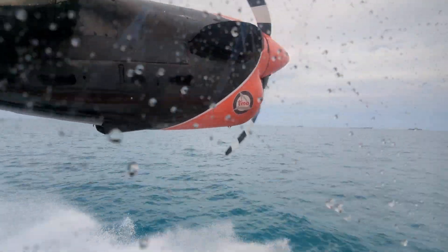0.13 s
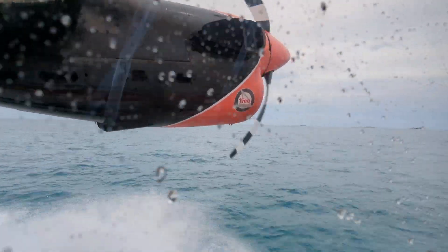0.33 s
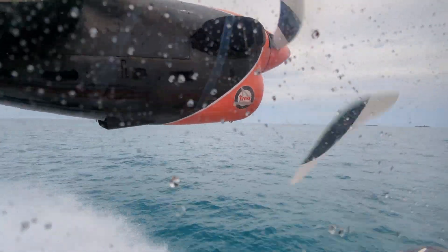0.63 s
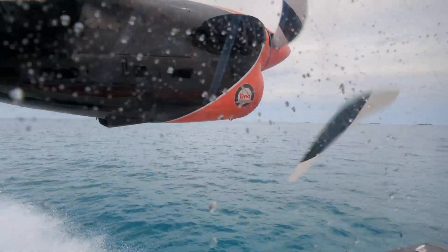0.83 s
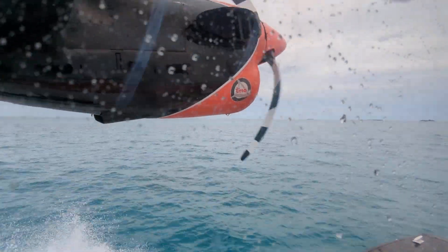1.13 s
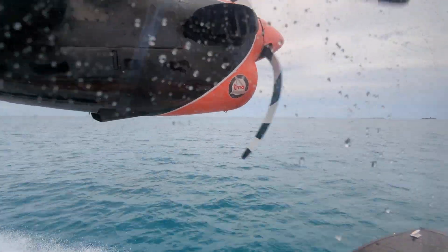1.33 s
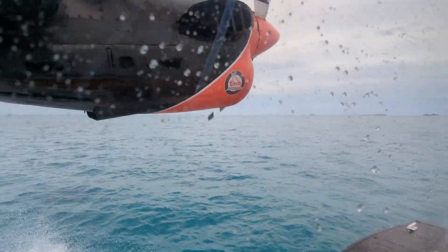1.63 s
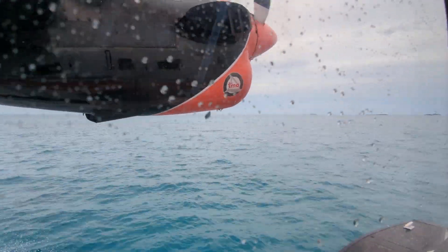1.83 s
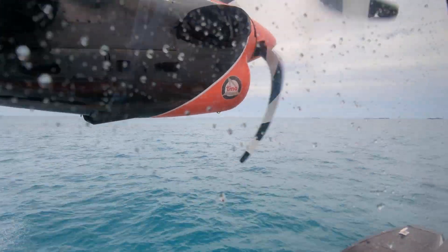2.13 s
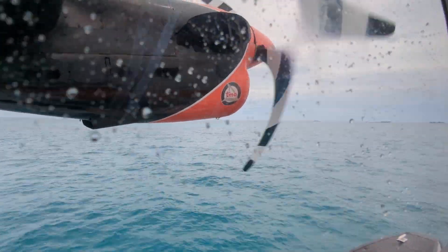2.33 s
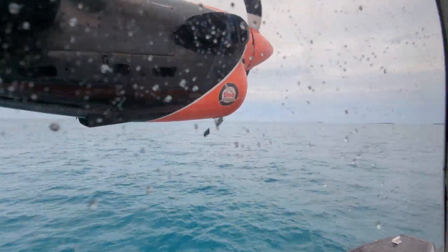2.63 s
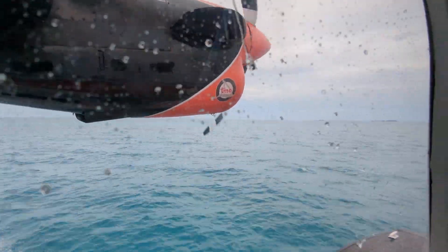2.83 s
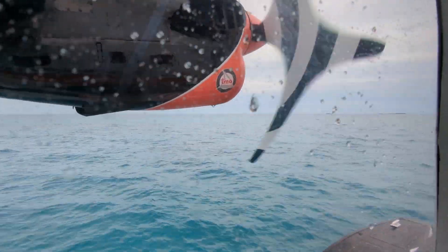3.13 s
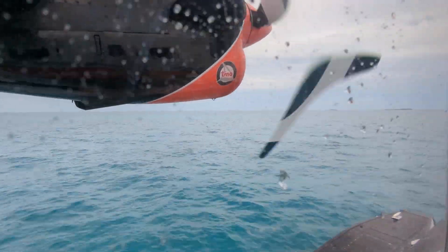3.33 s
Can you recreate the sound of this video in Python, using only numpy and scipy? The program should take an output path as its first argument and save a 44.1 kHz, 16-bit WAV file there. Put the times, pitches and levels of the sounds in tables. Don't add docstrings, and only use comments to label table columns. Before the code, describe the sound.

A loud turboprop propeller drone runs unbroken for about 3.5 seconds inside a small seaplane cabin: a deep hum near 105 hertz with strong overtones, two propellers beating slowly and shifting between sides. Beneath lie hull rumble, air roar and faint turbine hiss and whine, easing near 2.9 and returning by 3.4. Soft low float knocks, mostly buried, fall near 0.1, 0.9, 1.1, 2.2 and 3.0.

```python
import sys
import numpy as np
from scipy import signal
from scipy.io import wavfile

SR = 44100
rng = np.random.default_rng(int(sys.argv[2]) if len(sys.argv) > 2 else 0)


def level_to_linear(level):
    exponent = np.asarray(level, float) / 20
    return 10 ** exponent


def log_audio(samples):
    frames = np.atleast_2d(samples).T
    limited = np.clip(frames, -1, 1)
    pcm = np.round(limited * 32767).astype(np.int16)
    wavfile.write(sys.argv[1], SR, pcm)


N = 153468

BLADE_HZ = 104.65


def in_time(rows):
    s, *columns = np.transpose(rows)
    return [np.interp(np.arange(N) / SR, s, c) for c in columns]


def at_hz(points, hz):
    table_hz, values = np.transpose(points)
    return np.interp(np.log(hz), np.log(table_hz), values)


def rms_one(x):
    return x / np.sqrt(np.mean(x ** 2) + 1e-20)


def drift(rate_hz):
    r = np.exp(-40 * 2 * np.pi * rate_hz / SR)
    settle = 2000
    slow = signal.lfilter([1], [1, -2 * r, r * r], rng.standard_normal(N // 40 + settle + 2))[settle:]
    return np.interp(np.arange(N) / 40, np.arange(len(slow)), rms_one(slow))


# (time [s], near slip [Hz], far slip [Hz], blade level [dB], place [-1 to 1])
GOVERNORS = [(0, .023, -.309, -1.8, -.57), (.25, .096, -.339, .7, -1), (.5, .141, -.237, -2, -.43),
             (.75, .148, -.634, -2.1, .11), (.99, .188, -.079, 2.9, -.26), (1.24, .246, -.405, .2, .12),
             (1.49, .333, -.165, -.3, .04), (1.74, .266, -.312, -1.8, .13), (1.99, .164, -.144, .1, .17),
             (2.24, .106, -.263, .3, -.02), (2.49, .148, -.019, -2.3, .14), (2.73, .245, -.15, -2.2, .13),
             (2.98, .364, .059, -2.2, .14), (3.23, .333, -.103, .2, .11), (3.48, .188, .2, .8, -.05)]


def governors():
    near_slip, far_slip, blade_db, place = in_time(GOVERNORS)
    start_cycles = 0.282
    near = start_cycles + np.cumsum(BLADE_HZ + near_slip) / SR
    far = start_cycles + np.cumsum(BLADE_HZ + far_slip) / SR
    return near, far, blade_db, place


def shaken(order):
    height = 0.015 * drift(3) + 0.04 * drift(7)
    timing = 0.015 * drift(3) + 0.04 * drift(7)
    return np.exp(order ** 0.7 * (height + 1j * timing))


# (near left [dB], near right [dB], far left [dB], far right [dB], far blade ahead [cycles])
BLADE_ORDERS = [(-22.5, -18.3, -15, -15.5, .93), (-14, -16.1, -10.9, -13, .23),
                (-20.3, -22.5, -16.7, -18.6, .11), (-17.9, -21.6, -28.6, -33.8, .84),
                (-23.6, -29.5, -30.5, -39, .17), (-36.5, -47, -33, -44, .61), (-34.5, -44.5, -47, -47, .66),
                (-38, -50, -46, -57, .85), (-43, -51, -53, -53, .9), (-45, -48.5, -53, -56, .7),
                (-55, -55, -58, -58, .3), (-57, -60, -61, -61, .7), (-60, -56, -62, -60, .2),
                (-55, -61, -60, -63, .6)]
# (frequency [Hz], lag [cycles])
RIGHT_LAG = [(100, 0.06), (200, -0.031), (420, 0.0036), (525, 0.13), (630, 0.19), (1000, 0.51)]
# (frequency [Hz], near [dB per unit of place], far [dB per unit of place])
CABIN_WAVES = [(105.0, -2.9, 0.8), (209.0, 26.0, -0.6), (314.0, 0.1, -5.4), (419.0, -4.1, -7.6),
               (523.0, 2.9, 2.0), (628.0, -0.3, -5.1), (733.0, -6.6, -4.5), (900, -2, 2)]
# (shaft multiple, level [dB])
UNEQUAL_BLADES = [(2, -62), (4, -39), (5, -44.5), (7, -45), (8, -71), (14, -57)]


def propellers(near, far, place):
    out = 0
    waves = np.array(CABIN_WAVES)
    for order, (near_l, near_r, far_l, far_r, ahead) in enumerate(BLADE_ORDERS, 1):
        hz = order * BLADE_HZ
        near_wave = level_to_linear(place * at_hz(waves[:, [0, 1]], hz))
        far_wave = level_to_linear(place * at_hz(waves[:, [0, 2]], hz))
        near_turn = np.exp(2j * np.pi * order * near)
        far_turn = np.exp(2j * np.pi * (order * far + ahead))
        lag = np.array([[0], [at_hz(RIGHT_LAG, hz)]])
        near_sides = level_to_linear([[near_l], [near_r]]) * np.exp(-2j * np.pi * lag)
        far_sides = level_to_linear([[far_l], [far_r]])
        near_tone = shaken(order) * near_wave * near_turn * near_sides
        far_tone = shaken(order) * far_wave * far_turn * far_sides
        out = out - np.imag(near_tone + far_tone)
    for multiple, db in UNEQUAL_BLADES:
        phase = 2 * np.pi * multiple * near / 3
        out = out + level_to_linear(db + 3.0 * drift(4.0)) * np.sin(phase + 0.8 * drift(3.0))
    return out


# (time [s], level [dB])
AIR_VIGOUR = [
    (0.0, -43),
    (0.03, -41.5),
    (0.6, -45),
    (0.9, -41.5),
    (1.71, -44.5),
    (1.95, -42.5),
    (2.46, -44),
    (2.86, -47.5),
    (3.47, -42),
    (3.48, -43),
]


def vigour():
    return in_time(AIR_VIGOUR)[0]


# (frequency [Hz], left minus right [dB])
BALANCE = [(60, -12.5), (200, 6.5), (650, 7), (1100, 4.5), (2000, -7.5), (3300, -4), (5200, -11),
           (6200, -11.5)]
BALANCE_HIGH = [(6300, -6), (7200, 7.5), (8000, 2.5), (9000, 4), (12000, 1), (13500, 1)]


def sides(hz):
    left_right_db = at_hz(BALANCE + BALANCE_HIGH[1:], hz)
    return level_to_linear(left_right_db / 2 * np.array([[1], [-1]]))


# (frequency [Hz], correlation [-1 to 1])
ALIKE = [(60, 0.99), (130, 0.61), (400, .9), (700, 0.55), (1300, 0.26), (2500, .25), (5000, 0.033),
         (15000, .05)]


def banded(spectrum, patchy_db, count):
    edges = np.geomspace(spectrum[0][0], min(spectrum[-1][0], 0.45 * SR), count + 1)
    white = rng.standard_normal((2, 2, N))
    together = drift(2.7)
    out = 0
    for k, (low, high) in enumerate(zip(edges, edges[1:])):
        band = signal.butter(2, [low, high], "band", fs=SR, output="sos")
        mid, side = signal.sosfilt(band, white[k % 2])
        hz = np.sqrt(low * high)
        alike = np.clip(at_hz(ALIKE, hz), -1, 1)
        gain = level_to_linear(at_hz(spectrum, hz) + patchy_db * (0.27 * together + drift(18.0)))
        stereo = np.sqrt(1 + alike) * mid + np.sqrt(1 - alike) * side * [[1], [-1]]
        left, right = gain * sides(hz) * stereo
        if hz > 800:
            right = np.roll(right, int(0.00037 * SR))
        out = out + np.array([left, right])
    return out / np.sqrt(np.mean(out.mean(axis=0) ** 2))


# (frequency [Hz], density [dB per Hz])
RUMBLE_SPECTRUM = [(25, -8), (45, -30.5), (70, 0), (100, 0.5), (260, 3), (470, -7.5), (800, -11.5),
                   (1200, -9.5)]


def hull_rumble(flow_db):
    level_db = -29 + 0.78 * (flow_db - flow_db.mean())
    return level_to_linear(level_db) * banded(RUMBLE_SPECTRUM, patchy_db=1.5, count=12)


# (frequency [Hz], density [dB per Hz])
ROAR_SPECTRUM = [(1200, -6), (1400, -3.5), (2100, -6), (2900, -10.5), (3300, -13.5), (6200, -19),
                 (7000, -15.5), (8000, -30.5)]
# (frequency [Hz], density [dB per Hz])
HISS_SPECTRUM = [(8000, -12.5), (8700, 1.5), (9400, 1), (11000, 1.5), (12100, 2), (12900, -8), (15000, -7),
                 (17000, -7)]


def airflow(flow, near):
    roar = level_to_linear(0.94) * banded(ROAR_SPECTRUM, patchy_db=0.65, count=14)
    hiss = level_to_linear(-9.5) * banded(HISS_SPECTRUM, patchy_db=0.6, count=10)
    chop = 1 + 0.03 * np.cos(2 * np.pi * near)
    return flow * (roar + hiss) * chop


# (frequency [Hz], left [dB], right [dB])
GEAR_TONES = [(1987, -68, -60), (2971, -65, -78), (3078, -66, -78), (3180, -70, -78), (9968, -67, -73)]
# (frequency [Hz], width [Hz], level against the flow [dB])
INLET_WHISTLE = [(9975, 200, -15), (10080, 600, -13.5)]


def turbine(flow):
    out, t = 0, np.arange(N) / SR
    for hz, left_db, right_db in GEAR_TONES:
        level = level_to_linear(np.array([[left_db], [right_db]]) + 4.8 * drift(2.4))
        out = out + level * np.sin(2 * np.pi * hz * t + 1.1 * drift(4.5))
    for hz, width, db in INLET_WHISTLE:
        r = np.exp(-np.pi * width / SR)
        resonance = [1, -2 * r * np.cos(2 * np.pi * hz / SR), r * r]
        air = signal.lfilter([1, 0, -1], resonance, rng.standard_normal((2, N)))
        band = signal.butter(2, [hz - 420, hz + 700], "band", fs=SR, output="sos")
        air = rms_one(signal.sosfilt(band, air))
        level = flow * level_to_linear(db + 3.0 + 2.0 * drift(8.3))
        out = out + level * level_to_linear([[3.0], [-3.0]]) * air
    return out


# (time [s], peak [dB])
FLOAT_SLAPS = [
    (.07, -36),
    (.91, -33),
    (1.08, -36),
    (2.23, -27),
    (2.97, -33),
]


def floats():
    slaps = np.zeros(N)
    for s, db in FLOAT_SLAPS:
        slaps[int(s * SR)] = level_to_linear(db)
    hull_hz, t60_s = 77.5, 0.11
    r, w = level_to_linear(-60 / (t60_s * SR)), 2 * np.pi * hull_hz / SR
    knock = signal.lfilter([0, np.sin(w)], [1, -2 * r * np.cos(w), r * r], slaps + 1e-18)
    return signal.sosfilt(signal.butter(2, 130, fs=SR, output="sos"), knock)


def scene():
    near, far, blade_db, place = governors()
    flow_db = vigour()
    flow = level_to_linear(flow_db)
    blades = level_to_linear(blade_db) * propellers(near, far, place)
    return blades + hull_rumble(flow_db) + airflow(flow, near) + turbine(flow) + floats()


def band_limit(x):
    return signal.sosfilt(signal.butter(12, 15670, fs=SR, output="sos"), x)


def record(dry):
    x = signal.sosfilt(signal.butter(2, 32, "high", fs=SR, output="sos"), dry)
    ceiling = 1.6
    mix = ceiling * np.tanh(x / ceiling)
    return band_limit(mix)


dry = scene()
out = record(dry)
log_audio(out)
```